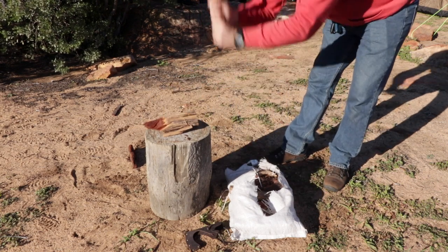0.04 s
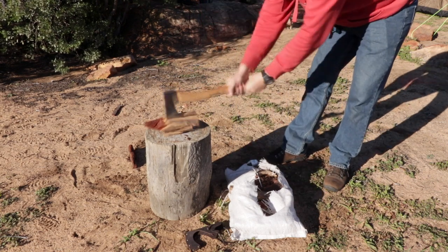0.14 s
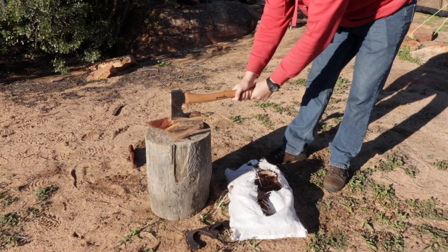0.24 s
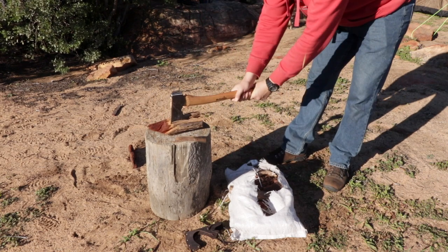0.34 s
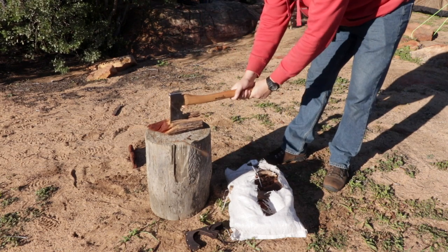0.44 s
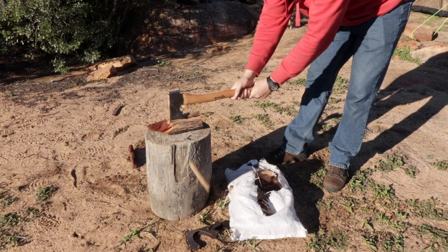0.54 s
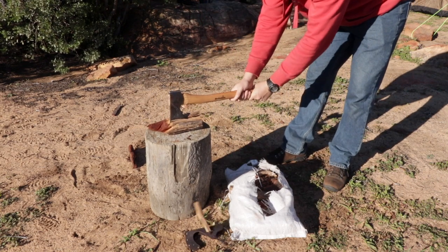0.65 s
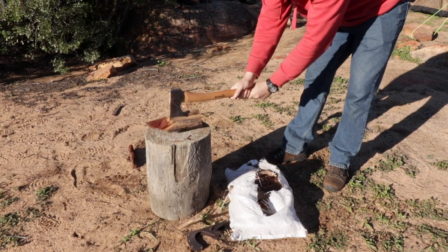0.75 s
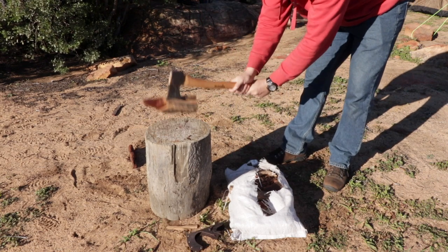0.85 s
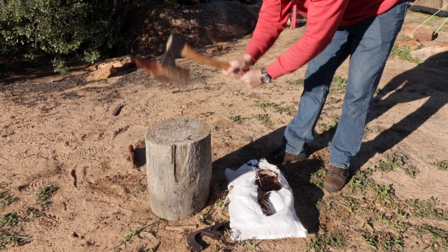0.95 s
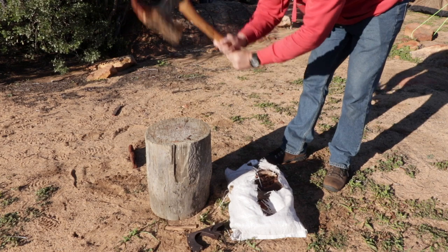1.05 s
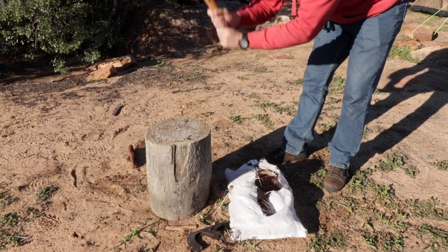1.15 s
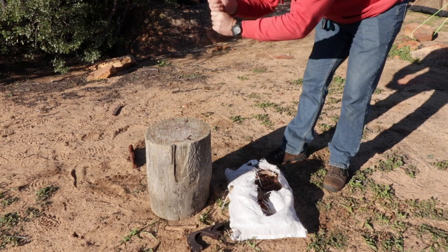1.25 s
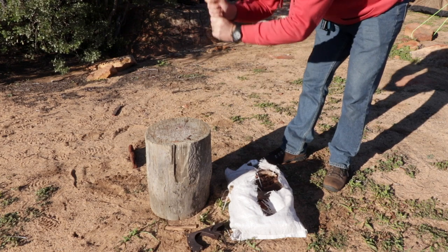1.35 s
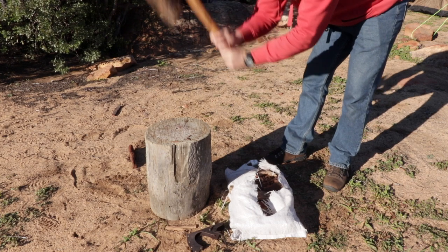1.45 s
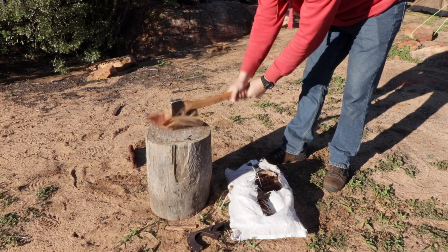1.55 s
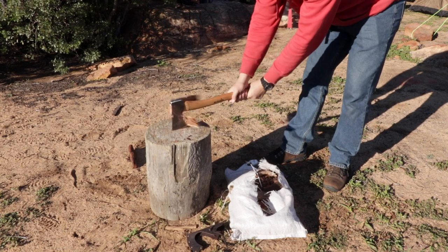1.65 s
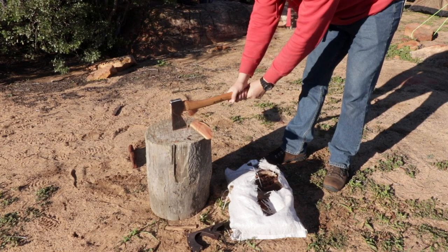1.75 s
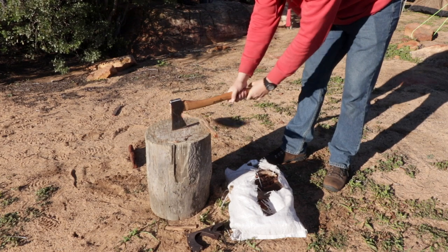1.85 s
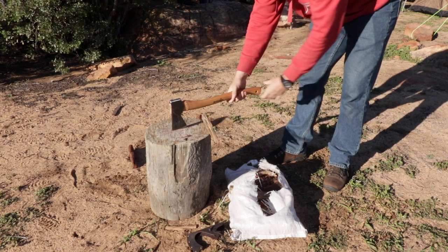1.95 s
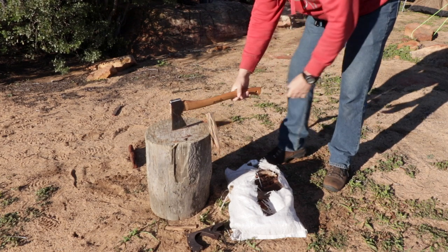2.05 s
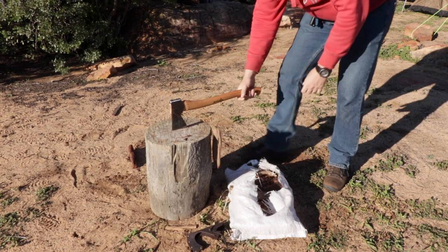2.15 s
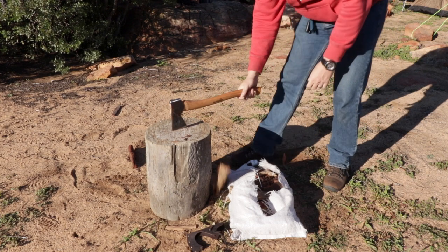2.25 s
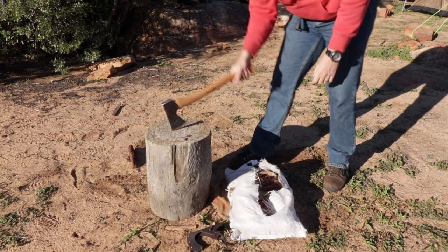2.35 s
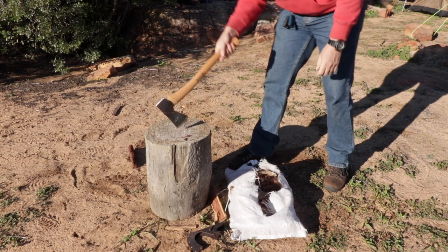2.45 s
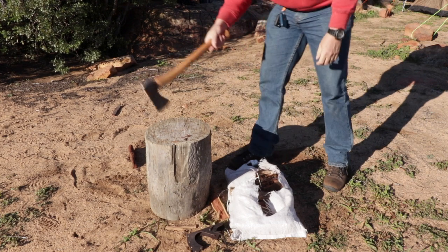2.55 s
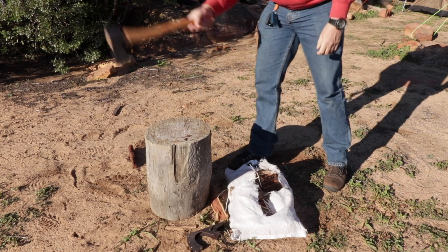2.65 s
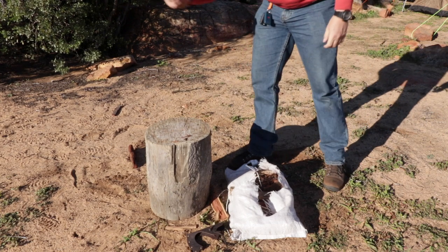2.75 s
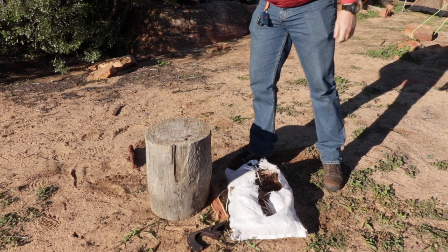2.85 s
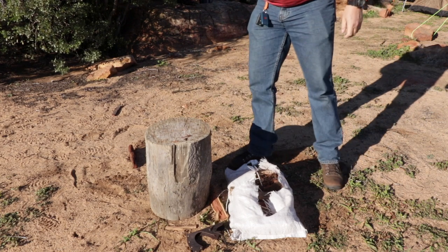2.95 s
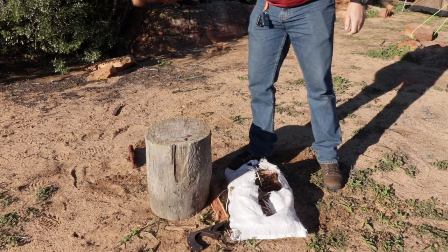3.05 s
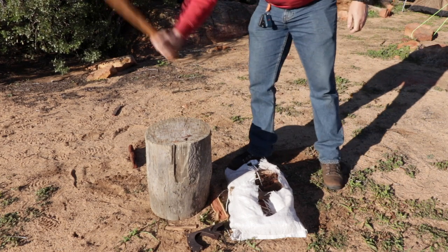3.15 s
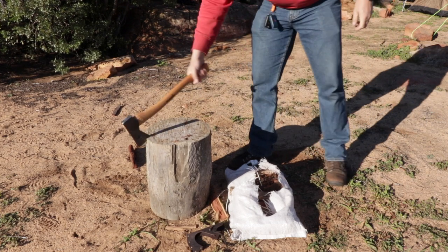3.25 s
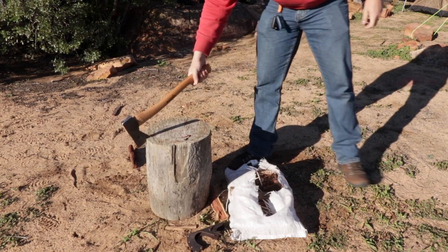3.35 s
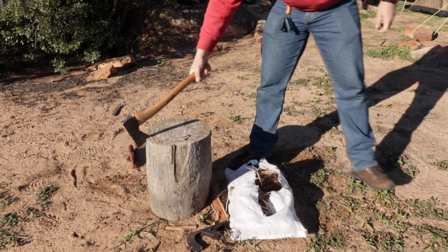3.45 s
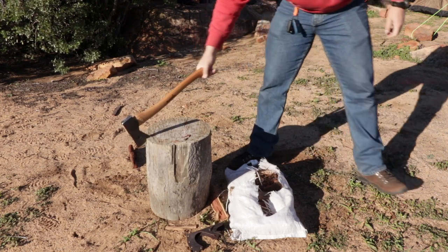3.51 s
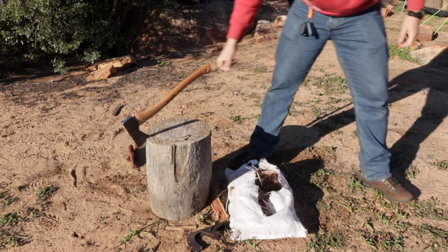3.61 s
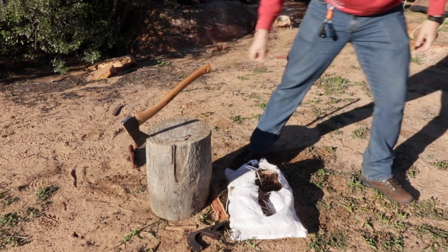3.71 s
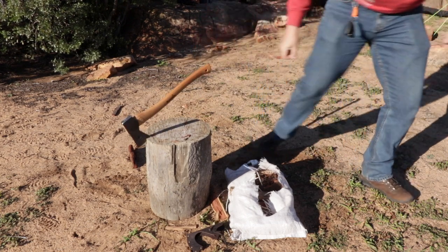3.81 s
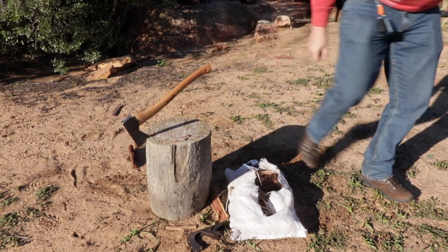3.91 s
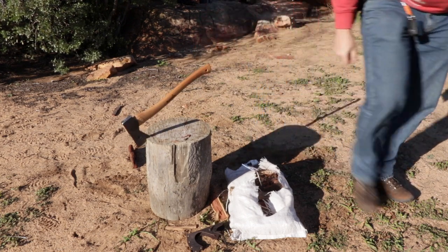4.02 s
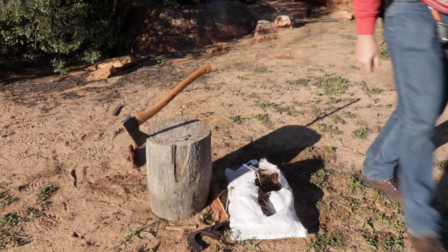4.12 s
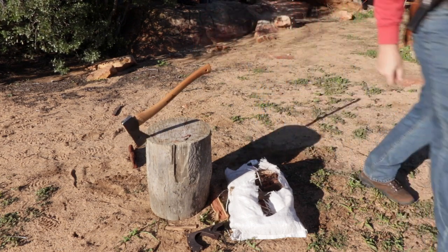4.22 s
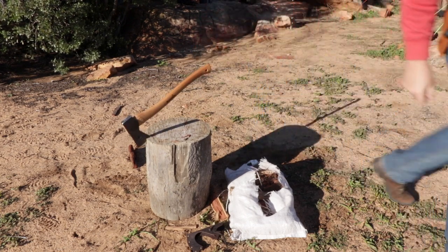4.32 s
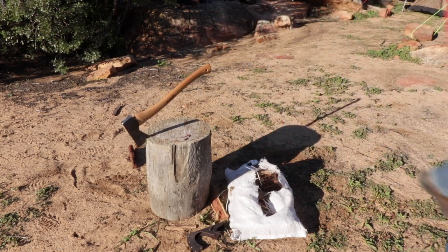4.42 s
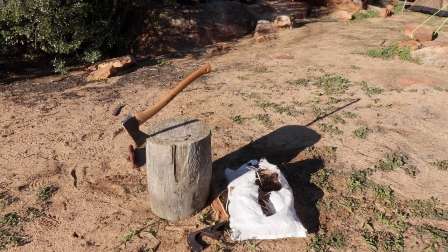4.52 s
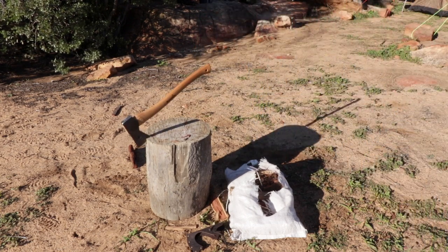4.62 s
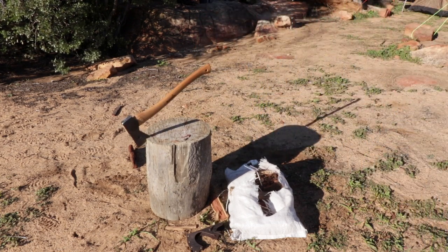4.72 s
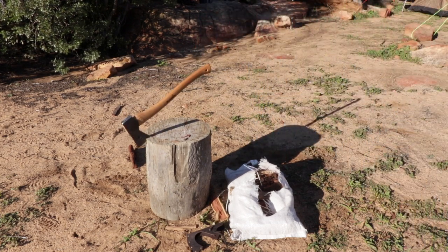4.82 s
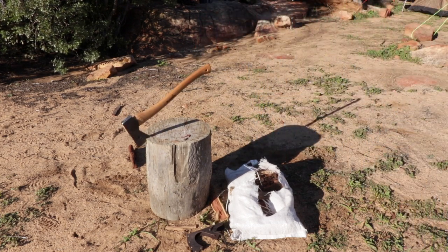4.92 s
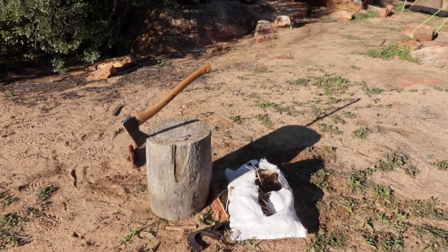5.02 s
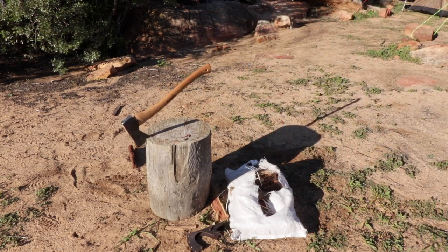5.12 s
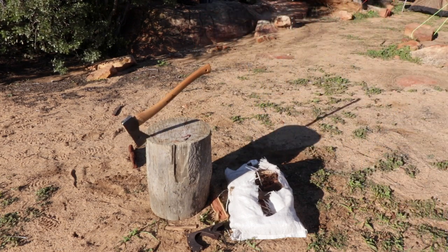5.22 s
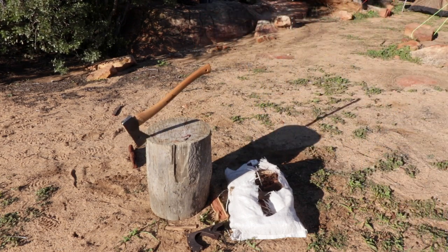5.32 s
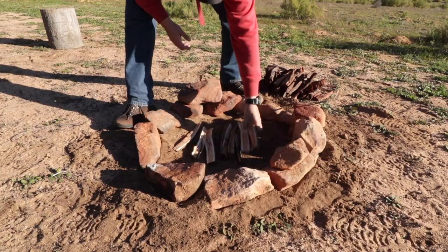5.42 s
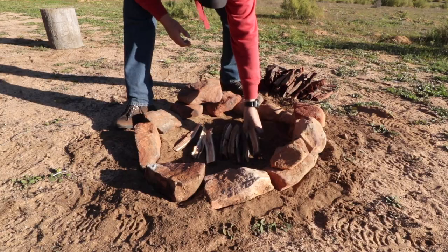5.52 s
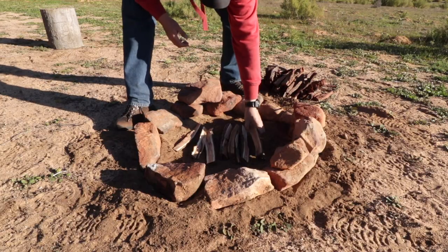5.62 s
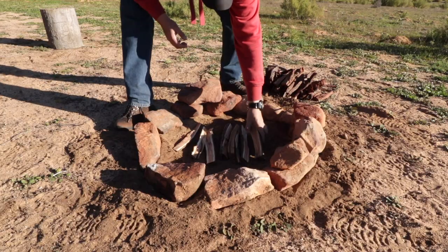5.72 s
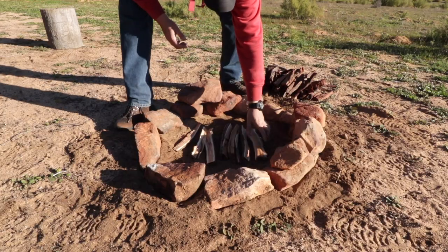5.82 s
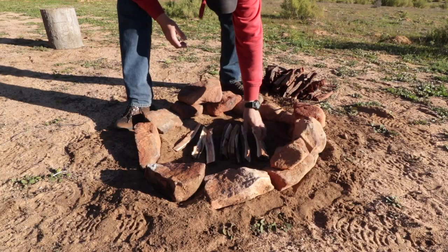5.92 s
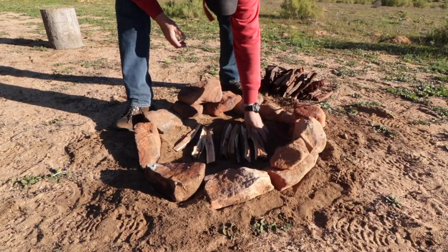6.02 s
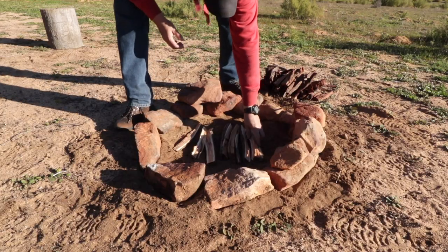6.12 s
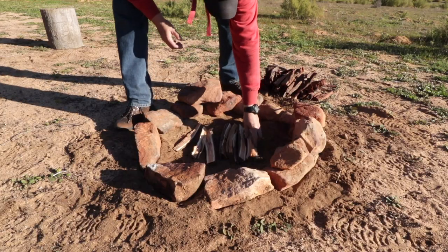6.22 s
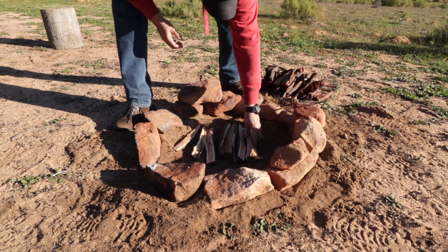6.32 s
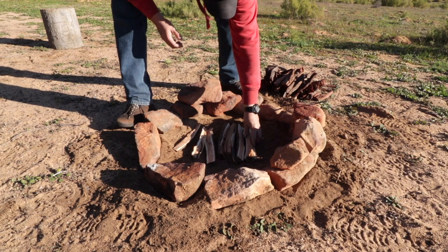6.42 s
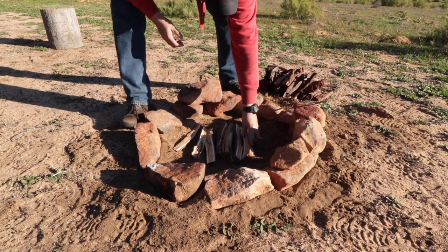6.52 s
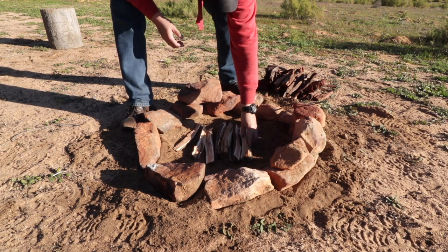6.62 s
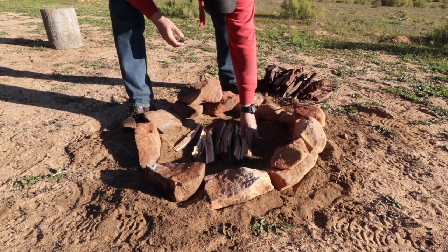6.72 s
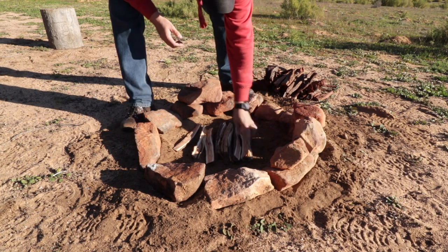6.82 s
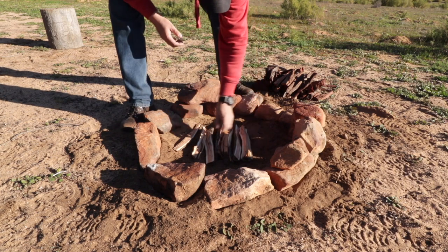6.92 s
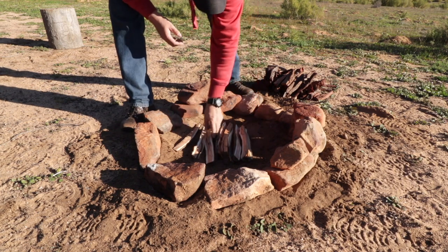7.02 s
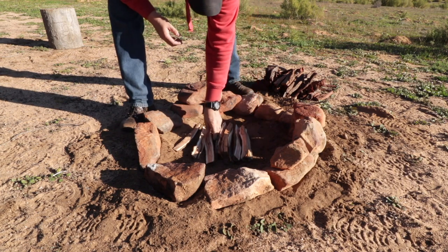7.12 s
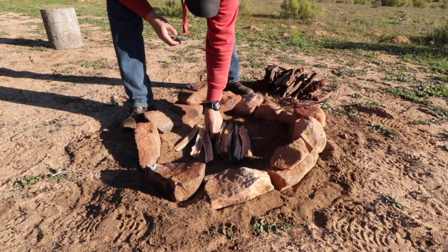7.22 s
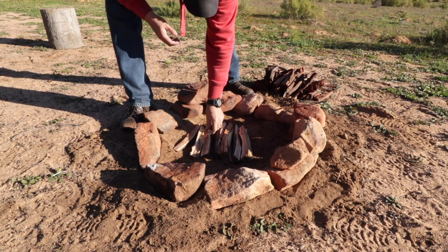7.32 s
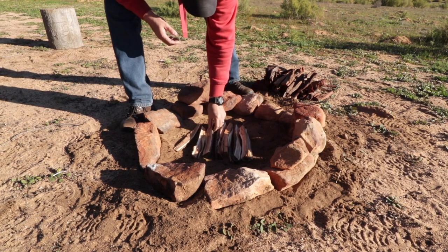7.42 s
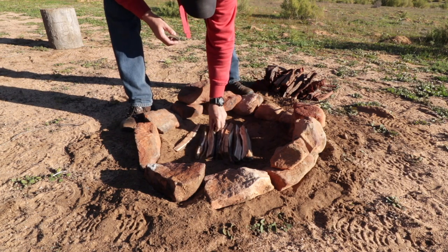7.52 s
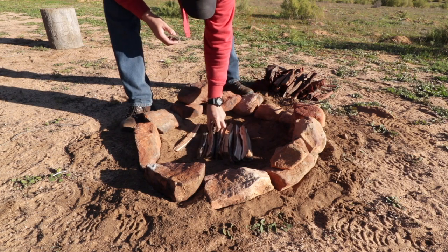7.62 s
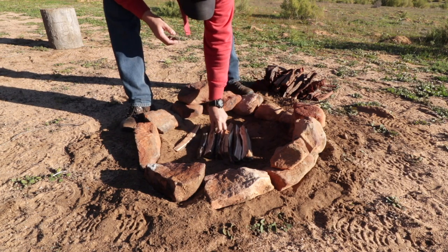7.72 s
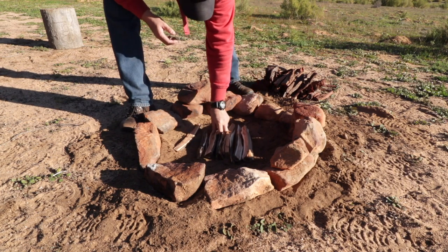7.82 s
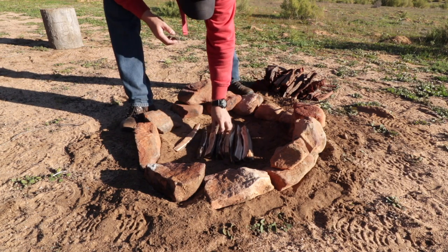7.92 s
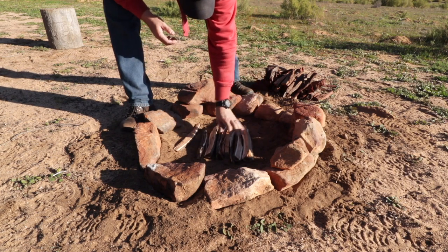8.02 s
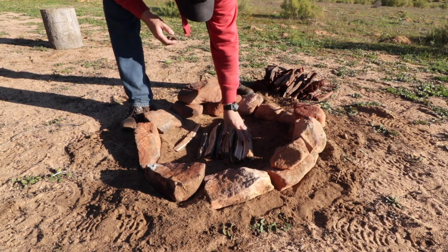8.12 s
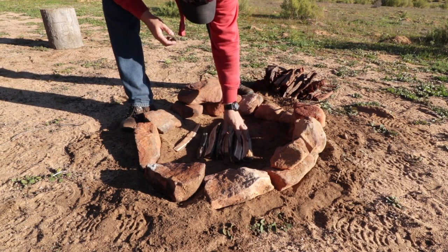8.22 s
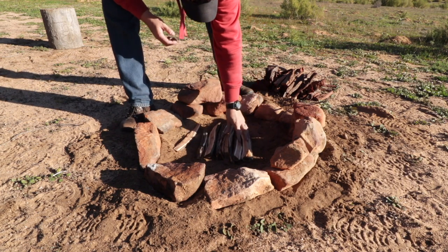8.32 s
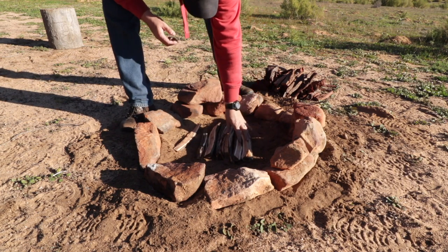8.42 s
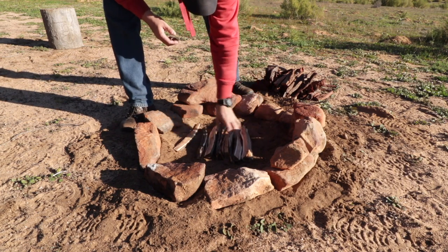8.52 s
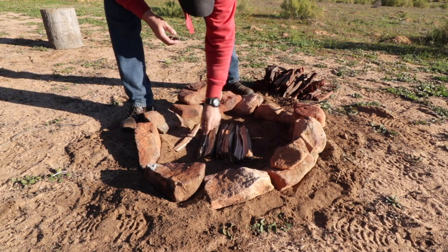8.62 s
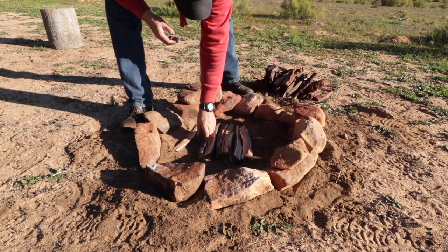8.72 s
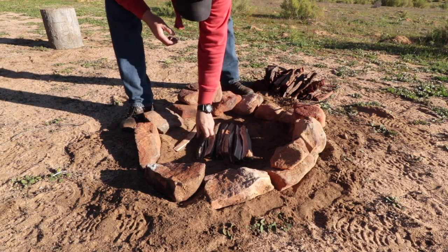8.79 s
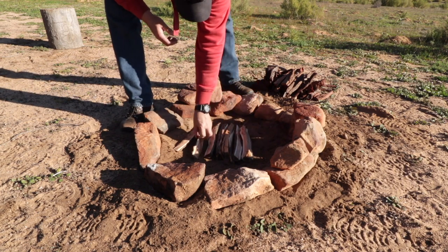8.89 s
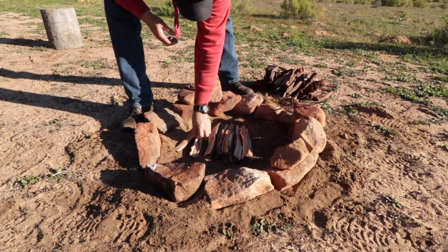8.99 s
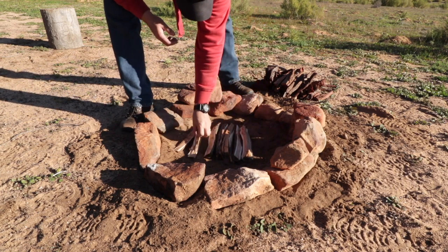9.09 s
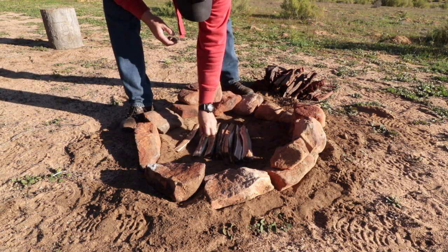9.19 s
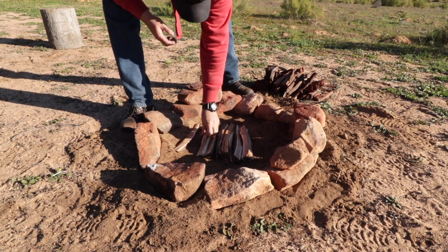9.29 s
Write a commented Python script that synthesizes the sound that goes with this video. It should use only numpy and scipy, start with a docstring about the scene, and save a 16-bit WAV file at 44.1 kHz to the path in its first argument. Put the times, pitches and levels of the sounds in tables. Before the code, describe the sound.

A hatchet cracks wood twice and sticks into a block, followed by sticks being stacked in gusty wind.

```python
"""A campsite. Two hatchet blows split kindling on a block: the log rings, fibres tear, the peaks overload
the microphone and split pieces drop. A far bird whistles now and then over a low rumble. The hatchet is
stuck into the block and boots scuff off over sand. At 5.4 s the scene cuts to the fire ring, where wind
buffets the microphone while sticks are laid on the pile, dragged bark on bark and knocked together."""
import sys
import numpy as np
from scipy import signal
from scipy.fft import rfft, irfft
from scipy.io import wavfile
from scipy.ndimage import uniform_filter1d

SR = 44100
rng = np.random.default_rng(int(sys.argv[2]) if len(sys.argv) > 2 else 0)


def transcribe(signal):
    """Save signal, clipped to [-1, 1], as a 16-bit WAV file at the path in sys.argv[1]."""
    frames = np.atleast_2d(signal).T
    limited = np.clip(frames, -1, 1)
    pcm = np.round(limited * 32767).astype(np.int16)
    wavfile.write(sys.argv[1], SR, pcm)


N = 412335
TIME_S = np.arange(N) / SR
EVENT_SAMPLES = SR * 3 // 4
AGE_S = TIME_S[:EVENT_SAMPLES]

# log modes, plus the bright snap of the overloaded blow: (frequency [Hz], level [dB], t60 [s])
LOG_AND_SNAP = [(353, -14, 0.091), (524, -13, 0.042), (1040.3, -3.5, .06), (1340, -6, .06), (1610, -3, .06),
                (1686, -2.5, .06), (2161, 0.5, 0.063), (2414, -5.5, .06), (2970, -8, .06),
                (3443, -6, 0.036), (5050, -9, 0.057), (7250, -9, 0.04), (8660, -15, .05)]
# freed piece modes: (frequency [Hz], level [dB], t60 [s])
PIECE_MODES = [(565, -25, .1), (1085, 0, .076), (1105, -26, .14), (2336, -15, .08)]
# wood cracking: (frequency [Hz], relative density [dB])
CRACK_SPECTRUM = [(200, -14), (400, -1.5), (750, -5.5), (1050, 1.5), (1300, -1.5), (1600, -1.5),
                  (2150, -3.5), (2700, -7.5), (3400, -9.5), (4200, -9.5), (5200, -8.5), (7500, -10),
                  (10000, -20.5), (16000, -25.5)]
# fibres tearing: (frequency [Hz], relative density [dB])
TEAR_SPECTRUM = [(100, -5.5), (300, -4.5), (800, -5), (2200, -1), (3300, -3), (4200, -4.5), (5200, -8),
                 (8500, -8), (10500, -18.5), (16000, -27)]
# blade contacts, two in the second blow:
# (time [s], level [dB], drive [s], pitch [ratio], tear [dB], tear t60 [s], piece ring [dB])
CHOP_CONTACTS = [(0.2154, -6.5, 0.0037, 1, -21, 0.14, -40), (1.6098, -4, 0.0032, 0.96, -21.5, 0.14, -5.5),
                 (1.6185, -16.5, 0.00096, 1.2, -30.5, 0.11, -54.5)]


def hatchet_chops():
    """With a bright snap the blade rings the log until it parts; fibres tear, the freed piece rings."""
    out, cracks = np.zeros(N), np.zeros(N)
    for time_s, db, drive_s, pitch, tear_db, tear_t60_s, piece_db in CHOP_CONTACTS:
        crack = undb(-2) * noise(CRACK_SPECTRUM)
        blow = undb(db) * fade(0.013, drive_s) * (ring(LOG_AND_SNAP, pitch) + crack)
        bundles = undb(2.8 * wander(350)[:EVENT_SAMPLES])  # fibres give way in bundles
        fibres = undb(tear_db) * fade(tear_t60_s) * bundles * noise(TEAR_SPECTRUM, grain_db=3.5)
        loosening = 1 - fade(0.073)
        piece = undb(piece_db) * loosening * ring(PIECE_MODES)
        add(out, time_s, blow + fibres + piece)
        add(cracks, time_s, undb(db) * fade(0.011, drive_s) * crack + fibres)
    slope_echo = echo(cracks, swell(AGE_S - 0.33, half_s=0.17))
    return out + undb(-56.5) * slope_echo


# chopping block modes: (frequency [Hz], level [dB], t60 [s])
BLOCK_MODES = [(200, -8, 0.041), (490, 3, 0.025), (614, 4, 0.028), (685, -5.5, 0.07), (1003, -5.5, 0.04),
               (1420, -12, 0.051), (2080, -11, 0.023), (2400, -14, 0.023), (2940, -13, 0.014),
               (3480, -25, 0.027), (5013, -26, 0.027)]
# blade entering end grain: (frequency [Hz], relative density [dB])
BITE_SPECTRUM = [(200, -5), (800, -2.5), (2200, 0.5), (4100, -5.5), (5500, -10.5), (8500, -12.5),
                 (10500, -23), (16000, -27)]
# blade on block: (time [s], level [dB], relative crack [dB])
BLOCK_CONTACTS = [(3.3055, -20.5, -3), (3.3082, -15, -5.5), (3.3135, -28.5, -26)]


def hatchet_into_block():
    """The blade bites into the end grain and rings the block."""
    out = np.zeros(N)
    for time_s, db, crack_db in BLOCK_CONTACTS:
        envelope = fade(0.014) + undb(-19) * fade(0.071)
        crack = envelope * noise(BITE_SPECTRUM, grain_db=2.5)
        add(out, time_s, undb(db) * (ring(BLOCK_MODES) + undb(crack_db) * crack))
    return out


# stick modes: (frequency [Hz], level [dB], t60 [s])
STICK_MODES = [(760, 0, .11), (680, -4, .025), (1066, -8, .08), (1260, -7, .028), (1430, -2, .03),
               (1660, -7, .022), (1865, -2, .052), (2830, -20, .03), (3290, -20, .04)]
# sticks laid down:
# (time [s], level [dB], main mode [Hz], tilt [dB/octave], relative crack [dB], damping t60 [s])
STICK_LANDINGS = [(5.4778, -18.5, 787, -4, -9, 2.5), (5.5098, -14, 751, 3, -17, 0.3),
                  (5.5235, -38, 758, 0, 3.5, 2.5), (5.8647, -28, 764, -0.5, -6, 3.1),
                  (9.2632, -16, 720, -15, -19.5, 0.15), (9.289, -24, 738, -11.5, -15, 0.081)]


def stick_clonks():
    """Sticks ring as they meet the pile, damped by hand and pile."""
    out = np.zeros(N)
    for time_s, db, hz, tilt_db_per_octave, crack_db, damping_t60_s in STICK_LANDINGS:
        crack = undb(crack_db) * fade(0.033) * noise(TEAR_SPECTRUM, grain_db=0.5)
        wood = ring(STICK_MODES, hz / STICK_MODES[0][0], tilt_db_per_octave)
        seating = 1 - fade(0.0027)  # rough bark takes a moment to seat
        add(out, time_s, undb(db) * seating * fade(damping_t60_s) * (wood + crack))
    return out


# dull landings: (time [s], level [dB], frequency [Hz], t60 [s])
DULL_LANDINGS = [(0.225, -26, 95, 0.1), (1.618, -25.5, 123, 0.064), (1.967, -17, 240, 0.011),
                 (1.975, -41, 148.4, 0.15), (2.172, -47.5, 275, 0.051), (5.479, -23, 199.3, 0.039),
                 (5.51, -17, 540, 0.017), (5.515, -28, 172, .06), (5.5343, -11, 258, 0.014)]


def thuds():
    """Pieces land on soil and pile, each with one low damped mode."""
    out = np.zeros(N)
    for time_s, db, hz, t60_s in DULL_LANDINGS:
        add(out, time_s, ring([(hz, db, t60_s)]))
    return out


# loose grit and bright ticks: (frequency [Hz], relative density [dB])
GRIT_SPECTRUM = [(1000, -25.5), (3000, -1), (5000, -3.5), (8500, 2), (10500, -7.5), (16000, -4.5)]
# chips and twigs: (time [s], body gain [dB], first mode [Hz], tick gain [dB], t60 [s])
CHIP_HITS = [(0.271, -29, 3240, -56, .035), (0.327, -33.5, 4900, -40, .012), (0.338, -43, 3130, -58, .025),
             (0.681, -37, 2140, -57.5, 0.015), (0.704, -42.5, 1160, -67, .03),
             (0.828, -59, 3040, -50.5, .023), (0.916, -60, 3468, -54.5, .02),
             (1.663, -29, 2128, -41, 0.025), (1.71, -35, 3040, -64, .028), (1.791, -42.5, 720, -50, .037),
             (1.848, -44.5, 634, -53, .027), (1.967, -22.5, 2000, -53, 0.013),
             (2.069, -47.5, 5250, -51, 0.022), (2.332, -46, 3160, -47, 0.027),
             (2.362, -41.5, 1280, -53.5, 0.036), (2.44, -37.5, 1881, -44, .031),
             (3.333, -41.5, 1480, -60, .08), (3.364, -51.5, 1480, -72, 0.043),
             (5.48, -17, 2790, -36, 0.017), (6.118, -39, 2540, -29, 0.029),
             (6.222, -28.5, 1495, -43, 0.051), (6.257, -24.5, 1180, -56, 0.021),
             (6.282, -23, 1830, -50, 0.028), (6.285, -25, 1160, -58, 0.024),
             (6.32, -34.5, 2640, -55, 0.024), (6.355, -39, 2700, -43.5, 0.018),
             (6.841, -57.5, 810, -39, 0.015), (7.313, -37, 1686, -38, .03), (7.53, -33.5, 690, -47, 0.072),
             (7.57, -32.5, 5000, -37, 0.013), (7.641, -41.5, 686, -39.5, 0.054),
             (7.789, -23.5, 710, -43, 0.036), (7.801, -30.5, 1103, -35, 0.057),
             (8.306, -34, 1780, -29.5, 0.018), (8.397, -45, 5060, -37, 0.032),
             (8.535, -34, 1630, -61, 0.034), (8.711, -39, 2600, -44, 0.021),
             (8.987, -32.5, 4640, -37.5, 0.022)]


def chip_knocks():
    """Chips and twigs knock, first by the block, then in the fire ring."""
    out = np.zeros(N)
    for time_s, db, hz, tick_db, t60_s in CHIP_HITS:
        add(out, time_s, chip(db, hz, tick_db, t60_s))
    return out


def chip(body_db, hz, tick_db, t60_s):
    """A small piece of wood knocks: two short modes, a crack and a bright tick."""
    modes = ring([(hz, -6, t60_s), (hz * 1.8, -13, t60_s * 0.74)])
    crack = undb(-9.5) * fade(t60_s) * noise(CRACK_SPECTRUM)
    tick = undb(-2.5) * fade(t60_s * 0.57) * noise(GRIT_SPECTRUM, grain_db=1)
    return undb(body_db) * (modes + crack) + undb(tick_db) * tick


# scraped stick modes: (frequency [ratio], Q [1], level [dB])
SCRAPE_MODES = [(0.999, 17, 7.5), (1.8, 21, -0.5), (2.58, 14, -9.5)]
# rubbed bark: (frequency [Hz], relative density [dB])
BARK_SPECTRUM = [(300, -2), (1200, 6.5), (3000, 2), (6000, -14.5), (8500, -15), (16000, -37)]
# stick over stick: (centre [s], half width [s], level [dB], first mode [Hz], ring re rub [dB])
SCRAPE_STROKES = [(2.2, 0.023, -71.5, 2900, 0.5), (5.539, 0.021, -50, 1870, -12.5),
                  (5.85, 0.049, -56, 2590, 1), (6.212, 0.069, -55, 2560, 1),
                  (6.451, 0.035, -55, 1820, -2.5), (6.588, 0.062, -51.5, 2530, -3),
                  (7.201, 0.065, -63.5, 1840, 4.5), (7.36, 0.068, -52.5, 1810, -1),
                  (7.559, 0.063, -60, 1800, -3.5), (7.85, 0.049, -55.5, 2660, -6),
                  (8.179, 0.015, -55, 2660, -4.5), (8.298, 0.055, -56.5, 1780, -3.5),
                  (8.518, 0.009, -58.5, 2600, -12.5), (8.779, .06, -61, 2600, -1),
                  (8.97, 0.033, -56.5, 2660, 2.5), (9.24, .08, -58.5, 2590, 2)]


def stick_scrapes():
    """Bark drags over bark in small catches that ring the stick, crush grit and shake splinters loose."""
    out, splinters = np.zeros(N), np.zeros(N)
    lead_s = 0.5
    for centre_s, half_s, db, hz, ring_db in SCRAPE_STROKES:
        slips = crackle(SR, grain_db=4.5)
        wood = sum(undb(mode_db) * signal.lfilter(*signal.iirpeak(hz * ratio, q, fs=SR), slips)
                   for ratio, q, mode_db in SCRAPE_MODES)
        rub = noise(BARK_SPECTRUM, SR, grain_db=-0.5)
        grit = undb(-5) * noise(GRIT_SPECTRUM, SR, grain_db=4.5)
        envelope = undb(db) * swell(TIME_S[:SR] - lead_s, half_s)
        add(out, centre_s - lead_s, envelope * (undb(ring_db) * wood / wood.std() + rub + grit))
        splinter = chip(db + 7, hz, tick_db=db + 13.5, t60_s=0.017)
        for offset, force in rng.standard_normal((5, 2)):
            time_s = min(centre_s + half_s * offset, TIME_S[-1])
            add(splinters, time_s, undb(3.5 * force) * splinter)
    snag_db = 3 * wander(140)
    hand_pressure_db = 1.47 * wander(25)
    return out * undb(snag_db + hand_pressure_db) + splinters


# sole on sand: (frequency [Hz], relative density [dB])
SOLE_SPECTRUM = [(150, 1.5), (500, 1.5), (1500, -2.5), (3000, -8), (6000, -16), (16000, -45)]
# scuffs: (centre [s], half width [s], level [dB], relative grit gain [dB])
SCUFF_STROKES = [(0.348, 0.025, -64, 2), (0.707, .04, -68.5, -10.5), (1.898, 0.027, -63.5, -11),
                 (1.991, 0.018, -55, -6), (2.18, 0.069, -68.5, -9), (2.362, 0.018, -61, 8.5),
                 (2.444, 0.014, -52.5, -1.5), (2.51, 0.095, -71.5, 2.5), (2.838, 0.057, -73.5, -2.5),
                 (3.627, 0.073, -69.5, 4), (3.795, 0.02, -61, -5), (4.345, 0.057, -61, -9),
                 (4.812, 0.07, -64.5, -2.5), (5.157, 0.0093, -69.5, 8.5), (5.299, 0.039, -65, 0.5)]


def sand_scuffs():
    """Boots and wood slide over sand: a dull rub with grains crackling in it."""
    rub_gain, grit_gain = np.zeros(N), np.zeros(N)
    for centre_s, half_s, db, grit_db in SCUFF_STROKES:
        pressure = undb(db) * swell(TIME_S - centre_s, half_s)
        rub_gain += pressure
        grit_gain += pressure * undb(grit_db)
    rub = undb(2 * wander(110)) * noise(SOLE_SPECTRUM, N, grain_db=4)
    grit = undb(2.25 * wander(260) - 3.5) * noise(GRIT_SPECTRUM, N, grain_db=4)
    return rub_gain * rub + grit_gain * grit


# wind strength: (time [s], level [dB])
GUST_LEVELS = [(5.42, -36), (5.62, -38.5), (5.89, -27.5), (5.98, -32.5), (6.22, -23), (6.37, -27.5),
               (6.45, -20.5), (6.52, -29.5), (6.66, -28.5), (6.8, -38.5), (7.2, -38.5), (7.47, -27.5),
               (7.66, -34.5), (7.82, -27.5), (8.0, -34), (8.5, -36), (8.62, -31.5), (9.08, -32),
               (9.22, -45.5)]
# buffeting: (frequency [Hz], relative density [dB])
BUFFET_SPECTRUM = [(15, 2), (28, 7.5), (50, -2.5), (80, -3), (120, -13.5), (200, -25.5), (400, -61)]
# small eddies: (frequency [Hz], relative density [dB])
EDDY_SPECTRUM = [(60, -41), (120, 0.5), (180, 1.5), (260, -6), (400, -13.5), (700, -27), (1500, -40.5),
                 (4000, -82)]
# breeze: (frequency [Hz], relative density [dB])
BREEZE_SPECTRUM = [(300, -14), (500, -3.5), (1000, -8), (2000, -12.5), (4000, -15.5), (6000, -17),
                   (8500, -17), (10500, -19), (15500, -20)]


def wind():
    """Gusts shake the microphone, small eddies grow with them and the breeze hisses steadily."""
    gust_db = curve(GUST_LEVELS)
    typical_gust_db, eddy_db_per_db = -34, 1.14
    eddy_db = -48.5 + eddy_db_per_db * (gust_db - typical_gust_db)
    buffet = undb(gust_db - 0.5 + 1.65 * wander(12)) * noise(BUFFET_SPECTRUM, N)
    eddies = undb(eddy_db + 2.75 * wander(30)) * noise(EDDY_SPECTRUM, N)
    breeze = undb(-58.5 + 0.5 * wander(5.5)) * noise(BREEZE_SPECTRUM, N)
    return buffet + eddies + breeze


# whistles: (time [s], length [s], start [Hz], target [Hz], glide time constant [s], level [dB])
BIRD_NOTES = [(0.005, 0.099, 1760, 1844, 0.03, -63), (0.081, 0.12, 1890, 2706, .011, -54.5),
              (.75, .06, 2700, 2450, 0.064, -81), (1.23, .08, 2404, 1856, .06, -86),
              (2.639, .11, 2600, 2000, 0.081, -74.5), (4.458, 0.055, 3394, 3260, 0.057, -76),
              (4.657, 0.056, 2950, 2500, 0.057, -74.5)]


def far_bird():
    """Nearly pure whistles each slide towards a pitch, blurred by the bushes."""
    out = np.zeros(N)
    edge_s = 0.016
    for time_s, length_s, start_hz, target_hz, glide_s, db in BIRD_NOTES:
        glide_hz = target_hz + (start_hz - target_hz) * np.exp(-AGE_S / glide_s)
        waver = 1 + 0.005 * wander(70)[:EVENT_SAMPLES]
        tone = np.sqrt(2) * np.sin(2 * np.pi * np.cumsum(glide_hz * waver) / SR)
        envelope = np.clip(np.minimum(AGE_S, length_s - AGE_S) / edge_s, 0, 1)
        add(out, time_s, undb(db) * envelope * tone)
    return out + undb(-15) * echo(out, fade(0.45))


# distant rumble: (time [s], level [dB])
RUMBLE_LEVELS = [(0, -47.5), (.82, -55), (1.2, -50), (2.9, -48), (3.22, -56), (3.4, -50.5), (4.4, -50),
                 (4.9, -55.5), (5.4, -57.5)]
# distant rumble: (frequency [Hz], relative density [dB])
RUMBLE_SPECTRUM = [(20, -10), (30, -11.5), (48, -0.5), (66, 3), (90, -11), (120, -6.5), (150, -17),
                   (220, -31), (300, -37.5), (400, -48)]
# air hiss: (frequency [Hz], relative density [dB])
HISS_SPECTRUM = [(200, 0.5), (500, -1), (1500, -6), (4000, -13), (8500, -14.5), (11000, -17),
                 (16000, -19.5)]


def still_air():
    """A low distant rumble and a very faint hiss."""
    rumble = undb(curve(RUMBLE_LEVELS) + 1.17 * wander(5.6)) * noise(RUMBLE_SPECTRUM, N)
    hiss = undb(-78 + 1.2 * wander(2.3)) * noise(HISS_SPECTRUM, N)
    return rumble + hiss


def echo(sound, envelope):
    """Diffuse scatter from bushes and slopes, with the treble soaked up."""
    tail = envelope * noise([(300, -8.5), (1000, -5), (2000, -5), (3000, 0), (5000, -1), (9000, -19.5)])
    return signal.fftconvolve(sound, tail / np.linalg.norm(tail))[:N]


def ring(partials, pitch=1, tilt_db_per_octave=0):
    """Damped sines of an impact; a harder contact tilts them upwards."""
    out = np.zeros(EVENT_SAMPLES)
    for k, (hz, db, t60_s) in enumerate(partials):
        gain = undb(db + tilt_db_per_octave * np.log2(hz / partials[0][0]))
        out += (-1) ** k * gain * fade(t60_s) * np.sin(2 * np.pi * hz * pitch * AGE_S)
    return out


def noise(spectrum, samples=EVENT_SAMPLES, grain_db=0):
    """Unit-RMS hiss or crackle, shaped by (frequency [Hz], relative density [dB]) points."""
    hz, db = np.transpose(spectrum)
    bins_hz = np.maximum(np.fft.rfftfreq(samples, 1 / SR), 1)
    colour = undb(np.interp(np.log(bins_hz), np.log(hz), db))
    rolloff = np.minimum(bins_hz / hz[0], 1) ** 2 * np.minimum(hz[-1] / bins_hz, 1) ** 4
    shaped = irfft(rfft(crackle(samples, grain_db)) * colour * rolloff, samples)
    return shaped / shaped.std()


def crackle(samples, grain_db):
    """Dense clicks; grain_db spreads their sizes from smooth hiss to grit."""
    clicks = rng.standard_normal(samples) * undb(grain_db * np.minimum(rng.exponential(size=samples), 7))
    return clicks / clicks.std()


def wander(rate_hz):
    """Smooth random drift of unit spread."""
    hold = int(SR / rate_hz)
    steps = np.repeat(rng.standard_normal(N // hold + 1), hold)
    drift = uniform_filter1d(uniform_filter1d(steps, hold), hold)[:N]
    return drift / drift.std()


def fade(t60_s, hold_s=0):
    """Hold, then exponential decay with a t60 of at least 3 ms."""
    return undb(-60 * np.maximum(AGE_S - hold_s, 0) / max(t60_s, 0.003))


def swell(offset_s, half_s):
    """Bell-shaped rise and fall."""
    return np.exp(-0.5 * np.minimum((offset_s / half_s) ** 2, 60))


def curve(table):
    """A (time [s], level [dB]) table at every sample."""
    return np.interp(TIME_S, *np.transpose(table))


def undb(db):
    """Decibels to gain."""
    return 10 ** (np.asarray(db) / 20)


def add(out, time_s, sound):
    """Mix a sound in at time_s."""
    start = int(time_s * SR)
    out[start:start + len(sound)] += sound[:N - start]


def scene():
    """First the chopping block, then the windy fire ring."""
    cut_s = 5.418
    background = np.where(TIME_S < cut_s, still_air() + sand_scuffs() + far_bird(), wind())
    hatchet = hatchet_chops() + hatchet_into_block()
    firewood = stick_clonks() + thuds() + chip_knocks() + stick_scrapes()
    return (hatchet + firewood + background)[None]


def record(dry):
    """The microphone flattens the loudest peaks; a low-pass cuts the top."""
    ceiling_db, cutoff_hz = -7, 16000
    clipped = dry / (1 + (dry / undb(ceiling_db)) ** 4) ** (1 / 4)
    lowpass = signal.ellip(8, 0.2, 70, cutoff_hz, fs=SR, output="sos")
    return signal.sosfilt(lowpass, clipped)


dry = scene()
out = record(dry)
transcribe(out)
```